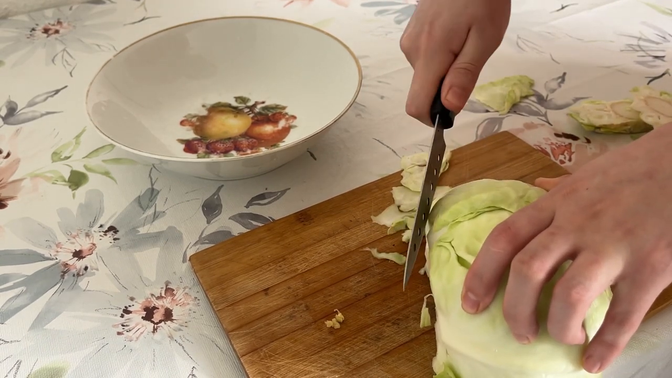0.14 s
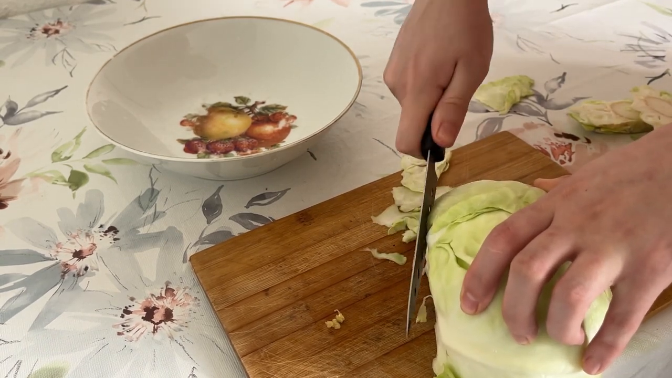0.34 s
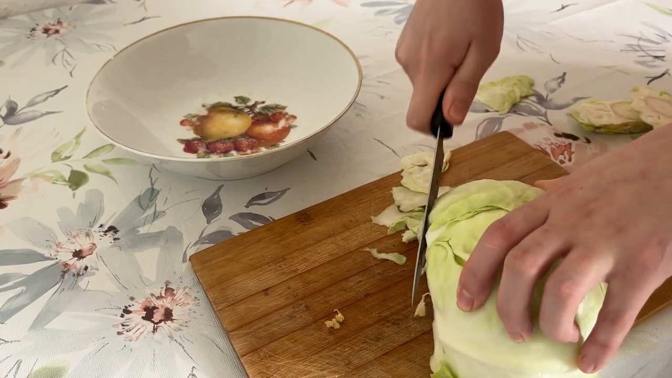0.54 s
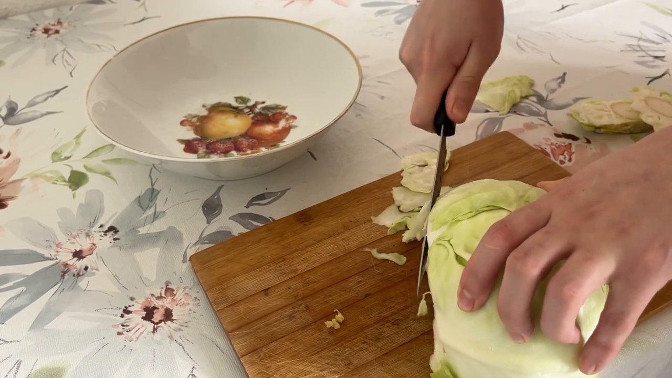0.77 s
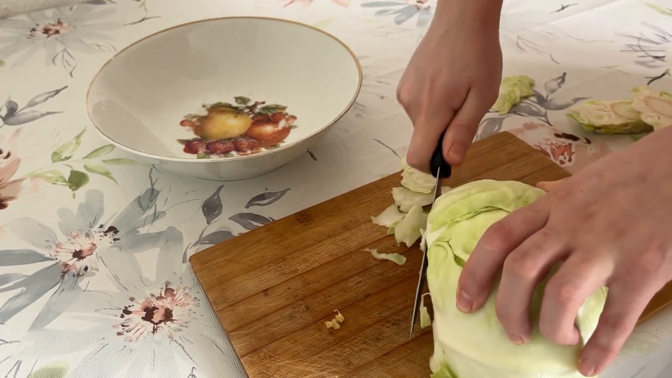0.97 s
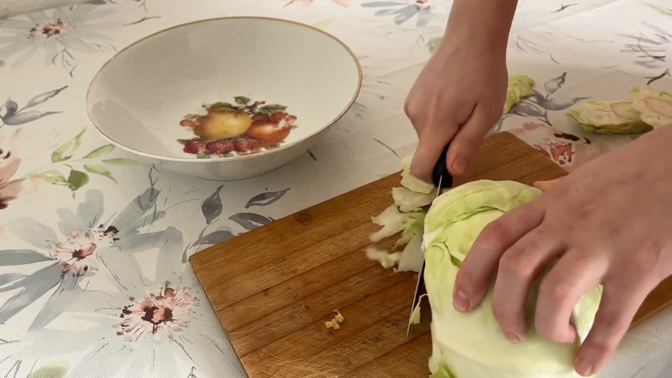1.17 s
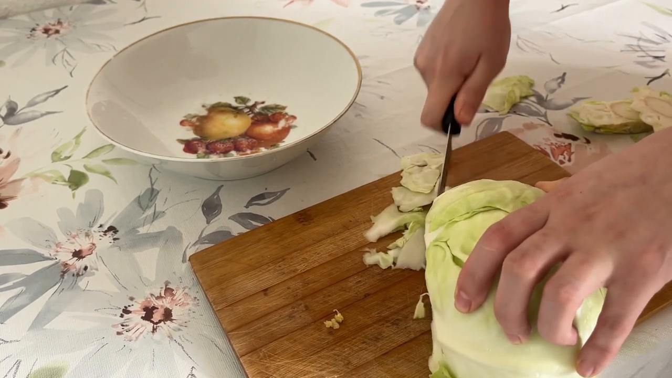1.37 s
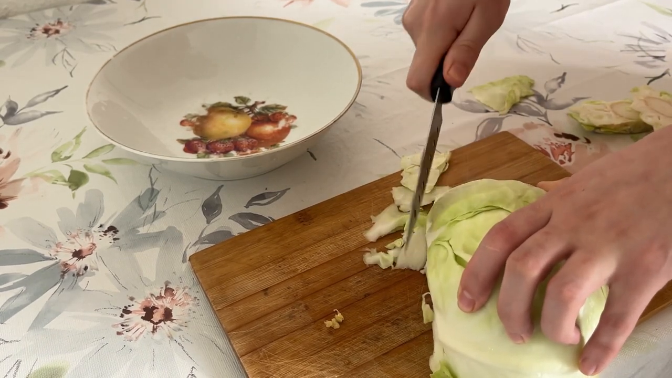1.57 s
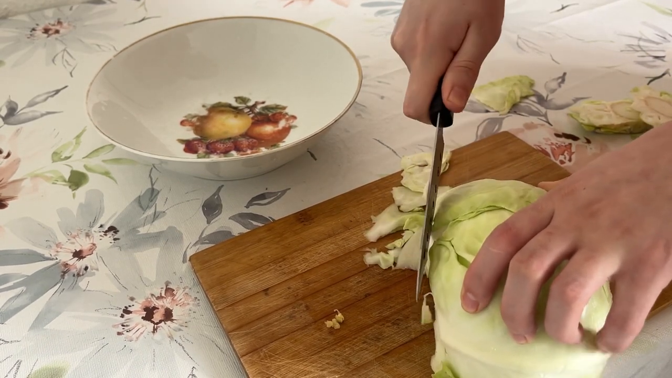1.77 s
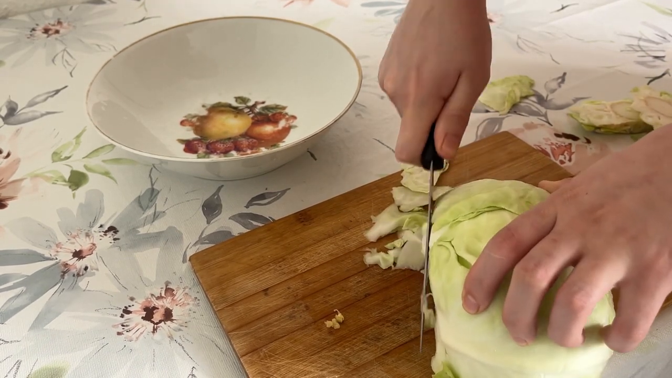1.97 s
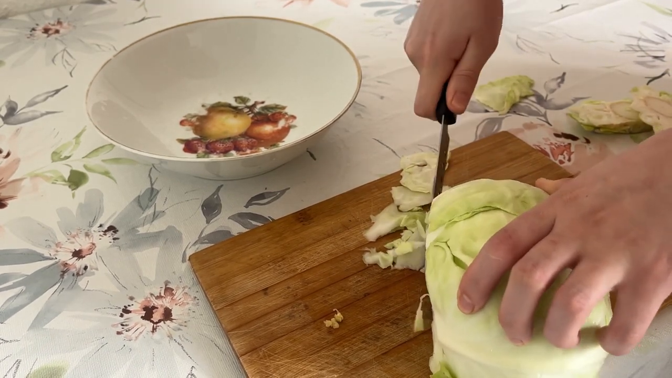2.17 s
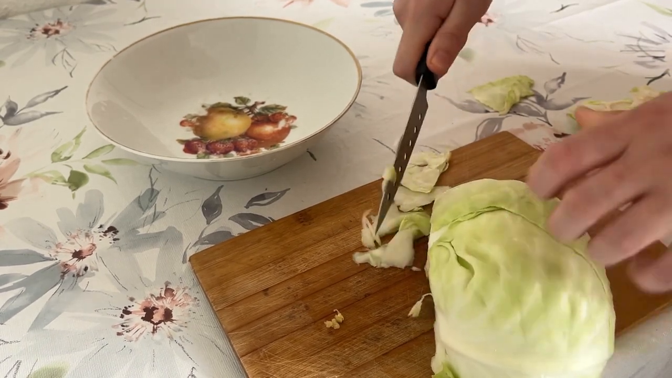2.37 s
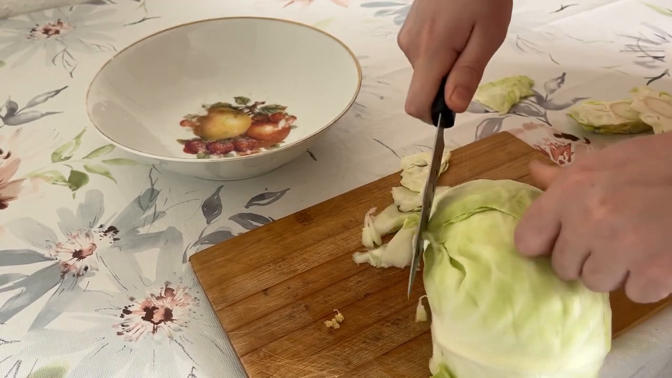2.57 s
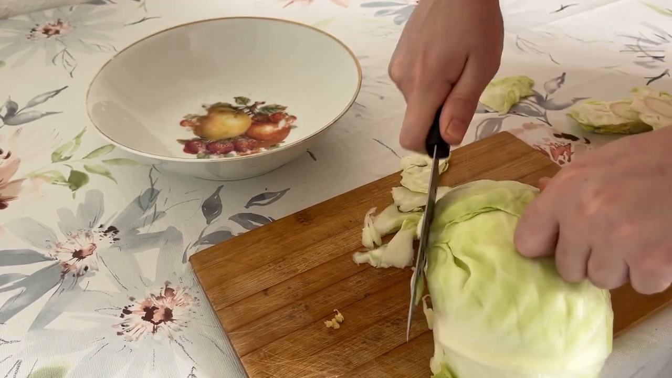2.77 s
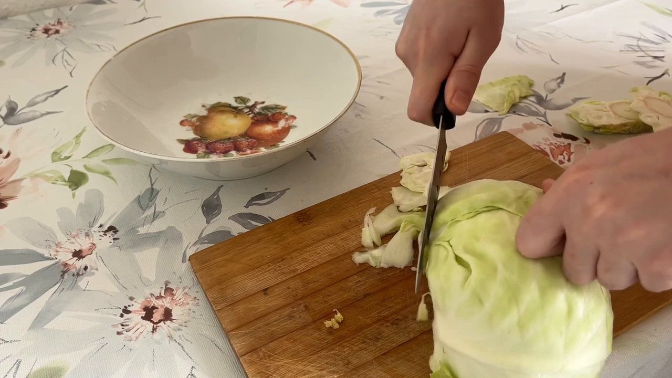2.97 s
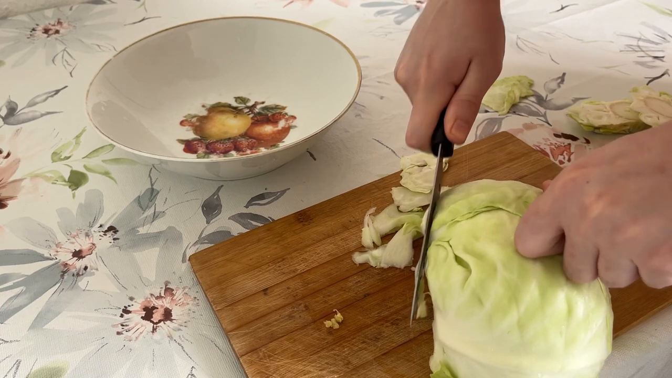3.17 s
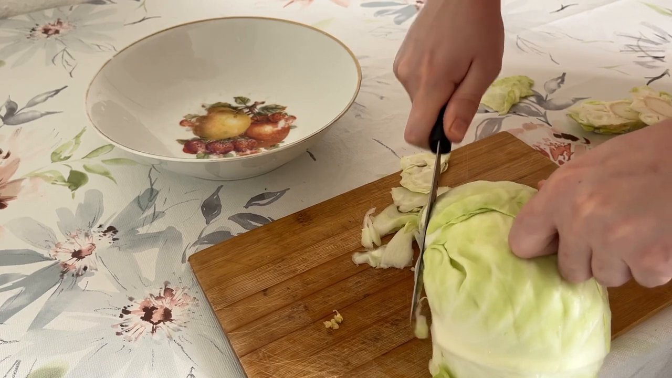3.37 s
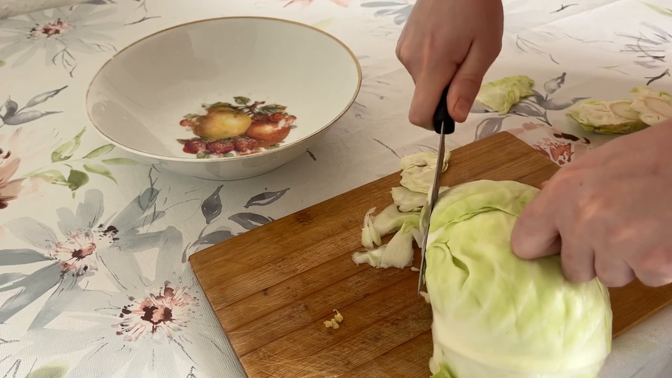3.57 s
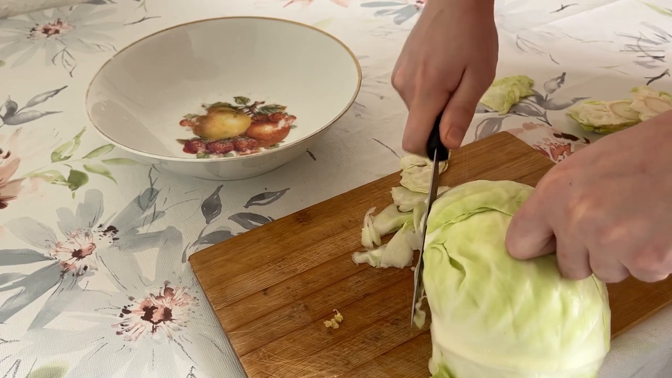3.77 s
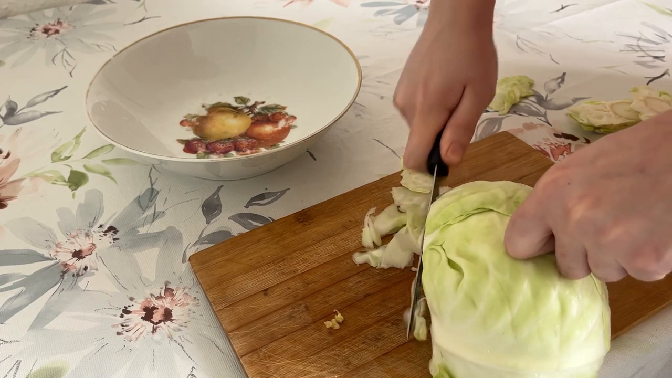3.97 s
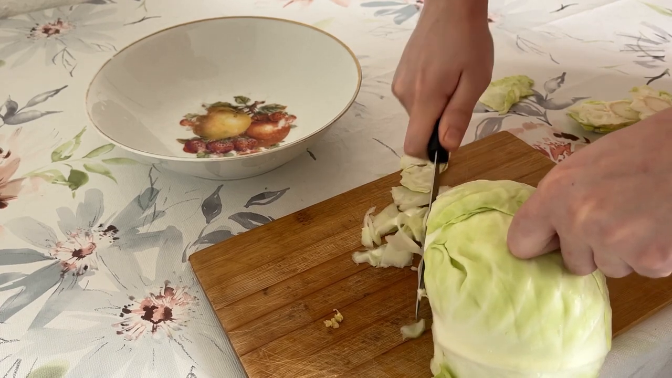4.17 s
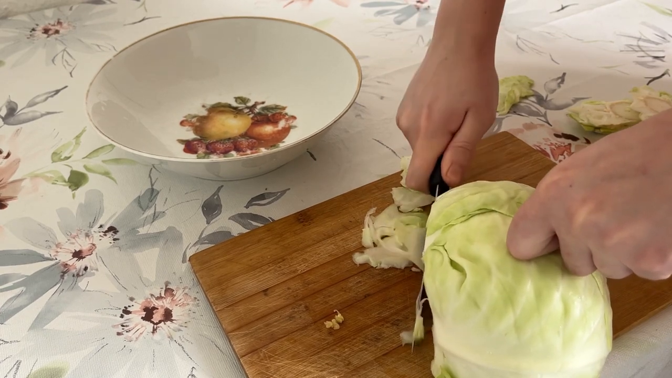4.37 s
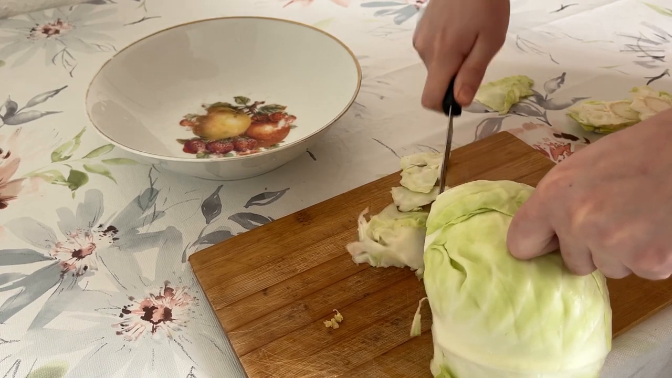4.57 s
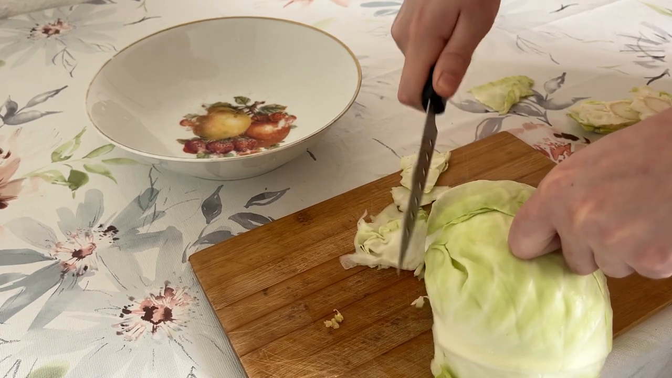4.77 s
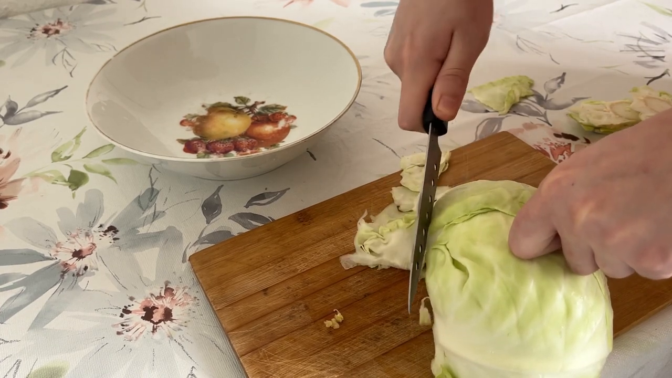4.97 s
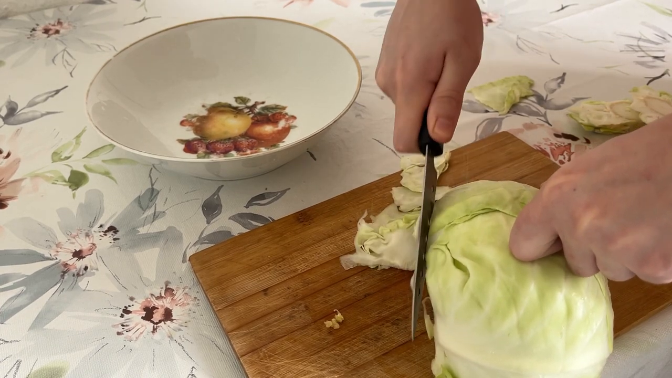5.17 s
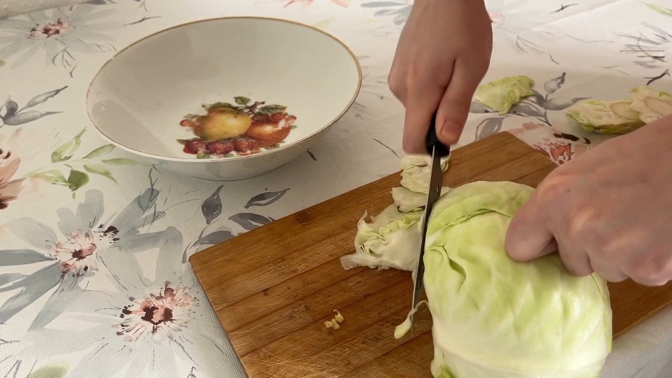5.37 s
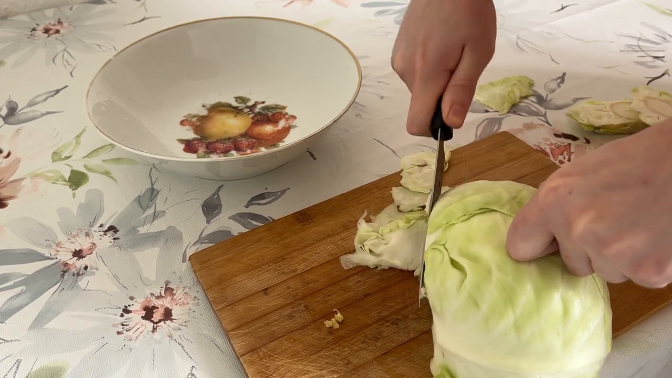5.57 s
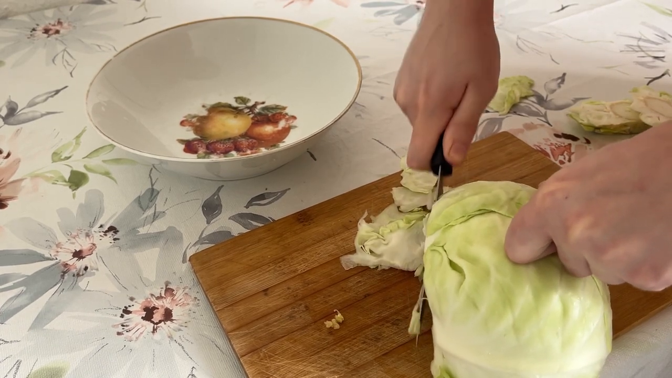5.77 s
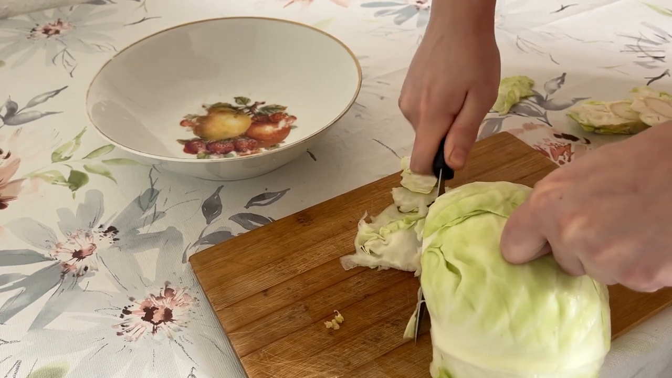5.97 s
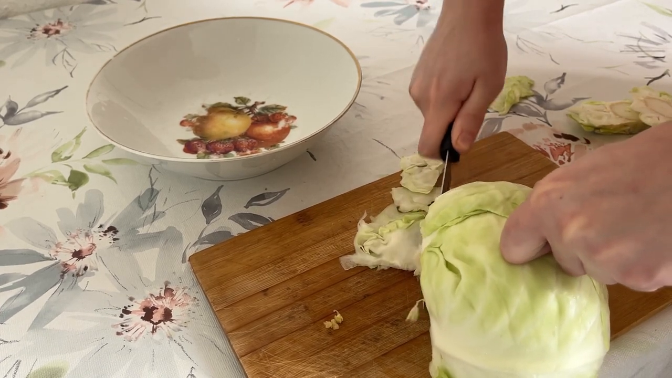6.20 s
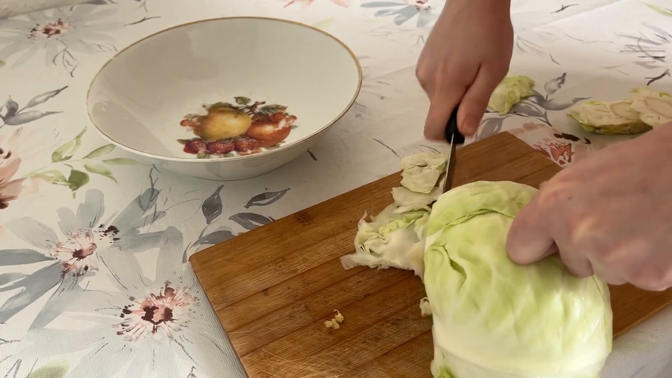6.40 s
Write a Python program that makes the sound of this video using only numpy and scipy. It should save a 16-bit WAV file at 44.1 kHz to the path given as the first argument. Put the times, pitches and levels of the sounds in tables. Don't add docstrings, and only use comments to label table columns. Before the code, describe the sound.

A knife saws crisply through a cabbage head, with a few sharp knocks and short scrapes on a wooden board over faint room hum.

```python
import sys
import numpy as np
from scipy import signal
from scipy.fft import rfft, irfft
from scipy.io import wavfile
from scipy.ndimage import uniform_filter1d

SR = 44100
rng = np.random.default_rng(int(sys.argv[2]) if len(sys.argv) > 2 else 0)


def persist_wave(psi):
    counts = np.round(np.clip(psi, -1, 1) * 32767).astype(np.int16)
    wavfile.write(sys.argv[1], SR, np.atleast_2d(counts).T)


def magnitude_from_level(level_db):
    exponent = np.asarray(level_db, float) / 20
    return 10 ** exponent


N = 283959

# time in seconds, level in dB.
RUMBLE_DB = [(0.0, -45.5), (0.5, -47), (0.81, -63), (0.84, -48), (0.91, -61.5), (2.29, -46), (2.6, -53),
             (2.69, -46), (2.78, -61.5), (3.23, -47), (3.28, -57.5), (3.95, -43.5), (5.09, -56.5),
             (5.22, -52.5), (6.38, -53.5), (6.44, -61)]
# time in seconds, pitch in Hz.
RUMBLE_HZ = [(0, 55.3), (2.6, 51.4), (2.9, 67.7), (3.2, 59), (3.6, 66.3), (4.5, 59), (4.8, 55.6),
             (6.44, 58.4)]
# pitch in Hz, rms level in dB.
HUM = [(96.9, -56), (200.7, -63), (121.4, -62.5), (298, -68.5)]
# frequency in Hz, level in dB per Hz.
AIR_SPECTRUM = [(15, -62.5), (25, 3.5), (75, -7.5), (148, -19.5), (274, -14), (349, -20), (469, -17.5),
                (684, -23), (945, -19.5), (1700, -28), (2300, -39.5), (3090, -43), (6730, -50), (7910, -92),
                (9300, -56.5), (15500, -70.5)]
# time in seconds, gain in dB.
AIR_SWELL_DB = [(0, 7.5), (1.0, 4), (1.7, 4), (2.4, 3), (3.5, 0.5), (4.9, -1.5), (6.44, 2)]

# strongest at in seconds,
# length in seconds, crunch in dB, fizz in dB re crunch, board in dB re crunch.
LEANS = [
    (0.304, 0.19, -56.5, 0, 2.6),
    (0.235, 0.13, -68, -16, 7.7),
    (1.126, 0.048, -43, -0.5, 1.3),
    (1.91, 0.21, -50.5, -0.5, 5),
    (2.787, 0.12, -56, -7, 1.5),
    (3.998, 0.27, -50, -7.5, 5.8),
    (4.307, 0.13, -44.5, -3, 9.1),
    (5.386, 0.25, -48.5, -11.5, 3),
    (5.963, 0.12, -47, -5, 2.3),
    (6.192, 0.021, -41.5, -10, 8.3),
]
# strongest at in seconds, length in seconds, crunch in dB,
# fizz in dB re crunch, board in dB re crunch.
PUSHES = [(0.56, 0.19, -50, -5.5, 4), (0.847, 0.18, -50, -6, 1.5), (2.70, 0.21, -61.5, -8, 3),
          (3.048, 0.17, -54.5, -5.5, 5.5), (3.344, 0.18, -57.5, -5, 6.5), (3.643, 0.24, -61.5, -3, 8.5),
          (4.881, 0.14, -67.5, -1, 5), (4.96, 0.13, -78, -9, -6), (5.051, 0.22, -55.5, -8, -5),
          (5.193, 0.19, -56.5, -10.5, -8), (5.644, 0.15, -42.5, -11, -0.5), (5.676, 0.11, -61.5, 0, 16.5)]
# strongest at in seconds, length in seconds,
# crunch in dB, fizz in dB re crunch, board in dB re crunch.
PULLS = [(0.448, 0.13, -64.5, -1.5, 8), (0.712, 0.15, -69.5, -7.5, 12), (1.002, 0.36, -65, -5.5, 9),
         (1.689, 0.22, -85, 1.5, 9.5), (1.809, 0.055, -74.5, 8, 10), (2.032, 0.14, -60.5, -7.5, 2),
         (2.56, 0.27, -71, -13, 12), (2.903, 0.17, -59.5, -13.5, -3), (3.21, 0.15, -64, -4, 6),
         (3.501, 0.16, -65.5, -7.5, 2.5), (3.798, 0.153, -66.5, -10, -6), (4.16, 0.15, -59, -10.5, 0),
         (5.512, 0.15, -61.5, -9.5, 3), (5.8, 0.17, -58.5, -13, -5), (6.124, 0.14, -79.5, 14, -2)]
# frequency in Hz, level in dB.
LEAF = [(120, -18.5), (300, 9.5), (800, 1.5), (2000, 10), (4000, 8.5), (7000, 6), (9000, -14)]
# frequency in Hz, level in dB.
FIZZ = [(5000, -13.5), (8300, -3.5), (11000, -5), (14000, -7), (15700, -10)]
# time in seconds, pitch in Hz, level in dB re crunch.
LEAF_RING = [(0.6, 4420, -19.5), (0.87, 3300, -3.5), (1.8, 4500, -1.5), (4.8, 4540, -17.5),
             (5.05, 4470, -1), (5.24, 4200, -3), (5.32, 6500, -5), (5.7, 6200, -10.5), (5.9, 3600, -16)]
# start in seconds, peak in dB, pitch in Hz, width as a share of pitch.
SNAPS = [(0.2593, -60, 4770, 1.5), (0.5277, -53, 3000, 1.5), (0.831, -58, 3600, 1.),
         (1.1177, -54, 3640, 1.), (1.6402, -62, 3400, 2.5), (1.7893, -64.5, 5200, 1.5),
         (2.6788, -64, 4000, 2.2), (3.023, -47, 4300, 1.4), (3.3129, -65, 3980, 2.7),
         (3.9383, -49, 3100, 1.5), (4.2527, -53, 3300, 1.4), (5.0115, -61, 4300, .8),
         (5.1866, -50, 3950, 0.34), (5.3058, -55, 5000, 2.5), (5.413, -63, 5000, 2.5),
         (5.9244, -49, 3300, 0.74), (6.138, -52, 3000, .7), (6.15, -44, 2600, 0.33), (0.8041, -52, 6000, 4),
         (0.9494, -47.5, 3960, 1.), (0.9735, -54, 3480, 0.73), (1.9731, -30, 4000, 4.8),
         (2.2196, -58, 2860, 0.28), (2.382, -55.5, 5970, 1.1), (2.526, -59.5, 4000, 3),
         (3.1375, -51, 3500, 1), (3.1860, -52.5, 2000, 0.4), (3.4982, -54, 2500, 2.2),
         (4.1374, -49, 2600, 0.48), (4.146, -47, 2850, 0.49), (4.882, -51, 3500, 2.2),
         (5.1666, -44, 4300, 0.47), (5.491, -58, 3500, 0.85), (5.51, -45.5, 5200, 0.57),
         (5.549, -58, 3020, 0.68), (5.6221, -49.5, 6400, 0.33), (5.745, -43.5, 2440, 1.9),
         (6.074, -40, 2700, 0.38), (6.133, -43, 2500, 0.3), (6.143, -47, 2800, .9), (6.324, -47, 2600, 0.8)]
# strongest at in seconds, length in seconds, level in dB, pitch in Hz.
CREAKS = [(0.29, 0.11, -56, 1350), (1.824, 0.12, -56.5, 1240), (2.62, 0.56, -66, 1550),
          (4.43, 0.08, -61.5, 3250), (4.466, 0.064, -49, 3200), (1.334, 0.089, -48, 3160),
          (4.667, 0.21, -61.5, 1560), (5.676, 0.11, -46, 590), (6.047, 0.2, -43.5, 1460)]

# time in seconds, pitch in Hz, level in dB.
SQUEAL = [(1.105, 1550, -55), (1.118, 1600, -41), (1.132, 1600, -36), (1.137, 1600, -60)]
# start in seconds, peak in dB, body, upper and top rings in dB re main ring.
KNOCKS = [(1.133, -1, -19, -5, 0.5), (1.303, -37, -24, -19, -2), (1.405, -27, -18, -6, -26),
          (2.072, -19.5, -14, -18.5, -13), (2.071, -32.5, -6, -34.5, 3), (3.751, -39.5, -30, -9, -31),
          (4.3176, -8, -18, -6, -24), (5.97, -6.5, -19.5, -4, -14.5), (6.183, -25.5, -26, -9, -4),
          (6.194, -26.5, -44, -27, -9), (6.2, -15, -14, -9.5, -6.5)]
# pitch in Hz, level in dB, T60 in seconds.
BOARD = [(184, -0.5, 0.1), (268.5, -5.5, 0.18), (503, 4.5, 0.051), (740, 18, 0.0038), (870, -1, 0.013),
         (950, 1, 0.026), (1155, 4, 0.014), (1336, 6, 0.02), (1594, 9, 0.011), (1748, -3, 0.024),
         (2600, -7.5, 0.007), (3030, 1.5, 0.013), (4500, -22, 0.0078)]
ZONES_HZ = [450, 930, 1600, 3100]
# strongest at in seconds, length in seconds, main ring in dB,
# upper rings in dB re main, grit in dB re main.
SETTLES = [
    (1.146, 0.19, -27, -2, -27.5),
    (1.402, 0.14, -60, -8, -30),
    (2.077, 0.12, -33.5, -10.5, -24.5),
    (4.33, 0.057, -57, -16, 4.5),
    (4.57, 0.33, -60, -6.5, -5.5),
    (5.981, 0.34, -38.5, -21, -18),
    (6.05, 0.33, -58.5, 6, -12.5),
    (6.201, 0.1, -36, 1, -11.5),
]
# strongest at in seconds, main ring in dB,
# singing edge in dB re main, grit in dB re main.
DRAGS = [
    (1.332, -42.5, 1.5, -7),
    (4.473, -33.5, -10.5, -15),
    (6.42, -40.5, -10, -11.5),
]
# pitch in Hz, width in Hz, level in dB.
SCRAPE = [(190, 160, -1), (454, 80, -2), (668, 140, -4), (906, 130, -2.5), (1265, 320, -2.5),
          (1540, 210, -7), (1844, 330, 0.5), (2657, 260, -2), (3163, 500, 4)]
# start in seconds, peak in dB, pitch in Hz, T60 in seconds.
SLIPS = [(1.15, -20, 1470, 0.046), (1.163, -14, 1190, 0.026), (1.186, -17.5, 920, 0.046),
         (1.205, -18.5, 1730, 0.022), (1.19, -28, 3100, 0.033), (1.303, -29, 1905, .05),
         (1.33, -20.5, 1836, 0.043), (1.338, -19, 1915, 0.043), (1.355, -27, 1920, 0.035),
         (2.073, -18.5, 916, 0.056), (2.09, -27, 880, .04), (2.096, -28.5, 931, 0.11),
         (2.092, -36, 1850, 0.087), (2.092, -47, 3070, 0.055), (2.104, -17, 895, 0.018),
         (2.076, -40, 3010, 0.063), (2.104, -42, 3180, .03), (4.305, -24, 1920, .02),
         (4.311, -32, 1980, 0.017), (4.326, -21, 1270, 0.033), (4.336, -21, 924, 0.062),
         (4.364, -27.5, 1564, 0.053), (4.372, -28, 980, .03), (4.39, -36, 1190, .03),
         (4.432, -22, 1750, 0.034), (4.465, -21, 1880, 0.051), (4.484, -29, 1970, .08),
         (4.506, -21, 950, 0.044), (5.99, -23, 1515, 0.036), (6.015, -29, 1630, 0.056),
         (6.074, -29, 1460, 0.053), (6.198, -14.5, 1950, 0.022), (6.359, -32, 1750, 0.034)]
# start in seconds, peak in dB, pitch in Hz, T60 in seconds.
BUMPS = [
    (1.62, -54, 62.6, .2),
    (3.992, -39, 157, 0.16),
    (4.82, -42.5, 399, 0.11),
    (5.697, -29, 114, 0.14),
]

# frequency in Hz, T60 in seconds.
KITCHEN_T60 = [(150, 0.53), (400, 0.48), (1000, 0.33), (2800, 0.18), (8000, 0.14)]
# frequency in Hz, correlation from -1 to 1.
ECHO_SAME = [(50, 0.995), (100, 0.43), (200, 0.66), (400, 0.42), (1000, -0.35), (1700, -0.0081),
             (2200, 0.41), (6500, -0.53), (7600, 0.67)]
# frequency in Hz, phase in half turns.
PORT_LEAD = [(0, 0), (1000, .05), (3000, -.3), (5100, 0), (8300, 1), (12050, 2), (15400, 3)]
# frequency in Hz, left minus right in dB.
PORT_DB = [(100, 0), (400, -2), (800, 1.5), (3000, 3), (6000, 1.5), (7600, 0)]

# rising share of length, falloff exponent, dB down at the ends
PUSH, LEAN, PULL = (0.32, 2.59, 43.4), (0.61, 1.57, 34.5), (0.48, 2.4, 11)
DRAG, SETTLE = (0.45, 2.2, 15), (0.08, 1.1, 16)
DRAG_S = 0.2
CUT_BODY_DB, CUT_UPPER_DB = -3.5, -2.5
DRAG_BODY_DB, DRAG_UPPER_DB = -9.5, -1.5
GRIT_FIZZ_DB = -11.5
GRIT_RING_HZ, GRIT_RING_DB = 3150, 0.5
EDGE_HZ, EDGE_WIDTH_HZ = 1890, 170
CREAK_WIDTH = 0.3
SNAP_T60_S = 0.016
SLIP_RISE_S, BUMP_RISE_S = 0.003, 0.0086
KNOCK_ROOM_DB, CRACK_S = -3.5, 0.003
AIR_DB = -52


def evened(x):
    return x / np.sqrt(np.mean(x ** 2) + 1e-20)


def read(points, hz):
    f, value = np.transpose(points)
    return np.interp(np.log(hz + 1), np.log(f + 1), value)


def curves(table):
    s, *columns = np.transpose(table)
    return [np.interp(np.arange(N) / SR, s, c) for c in columns]


def colour(x, points):
    hz = np.fft.rfftfreq(N, 1 / SR)
    inside = (hz > points[0][0] / 2) & (hz < points[-1][0] * 1.02)
    return evened(irfft(rfft(x) * magnitude_from_level(read(points, hz)) * inside, N))


def resonate(x, hz, width_hz):
    r = np.exp(-np.pi * width_hz / SR)
    if np.ndim(hz) == 0:
        return 2 * signal.lfilter([1 - r], [1, -r * np.exp(2j * np.pi * hz / SR)], x).real
    turn = np.exp(2j * np.pi * np.cumsum(hz) / SR)
    return 2 * (turn * signal.lfilter([1 - r], [1, -r], x / turn)).real


def resonate_twice(x, hz, width_hz, second_width_hz):
    return resonate(resonate(x, hz, width_hz), hz, second_width_hz)


def crackle(per_s, spread_db, clump_db, largest):
    size = magnitude_from_level(spread_db * np.minimum(rng.exponential(1, N), largest))
    drift = uniform_filter1d(uniform_filter1d(rng.standard_normal(N), 400), 400)
    clicks = rng.standard_normal(N) * (rng.random(N) < per_s / SR)
    return evened(magnitude_from_level(clump_db * evened(drift)) * size * clicks)


def add(mix, s, sound):
    part = mix[round(s * SR):][:len(sound)]
    part += sound[:len(part)]


def zone(hz, levels_db):
    at = np.interp(np.log(hz), np.log(ZONES_HZ), np.arange(len(ZONES_HZ)))
    return sum(max(1 - abs(at - k), 0) * db for k, db in enumerate(levels_db))


def stroke(s, length, shape):
    rising, exponent, ends_db = shape
    t = np.arange(0, N / SR + 0.002, 0.001) - s
    far = np.where(t < 0, -t / rising, t / (1 - rising)) / length
    return magnitude_from_level(-ends_db * np.minimum(far, 3) ** exponent) * (far < 3)


def per_sample(per_ms):
    return np.interp(np.arange(N) * 1000 / SR, np.arange(len(per_ms)), per_ms)


def room_tone():
    hz = curves(RUMBLE_HZ)[0]
    rumble = evened(resonate_twice(rng.standard_normal(N), hz, 6.7, 14.0))
    envelope = abs(signal.hilbert(rumble))
    rumble = evened(rumble / (envelope + 0.15) ** 0.7)
    t = np.arange(N) / SR
    waver = evened(uniform_filter1d(rng.standard_normal((len(HUM), N)), 6000))
    hum = np.zeros(N)
    for (f, db), w in zip(HUM, waver):
        hum += magnitude_from_level(db + 2.1 * w) * np.sqrt(2) * np.sin(2 * np.pi * (f * t + rng.random()))
    return magnitude_from_level(curves(RUMBLE_DB)[0] + 3.0) * rumble + hum


def air():
    frames, hz = N // 512 + 5, np.fft.rfftfreq(2048, 1 / SR)
    a, b, c, d, patches = rng.standard_normal((frames, 1025, 5)).T
    patches = evened(uniform_filter1d(uniform_filter1d(patches, 14, 0), 8, 1))
    z = np.array([a + 1j * b, c + 1j * d]) * magnitude_from_level(read(AIR_SPECTRUM, hz)[:, None] + 0.77 * patches)
    return magnitude_from_level(AIR_DB) * evened(signal.istft(z, nperseg=2048, noverlap=1536)[1][:, :N])


def blade():
    leaf = wood = edge = 0
    for shape, rows in ((PUSH, PUSHES), (LEAN, LEANS), (PULL, PULLS)):
        for s, length, db, fizz, board in rows:
            levels_db = db + np.array([0, fizz, board, board + CUT_BODY_DB, board + CUT_UPPER_DB])
            leaf = leaf + np.outer(magnitude_from_level(levels_db), stroke(s, length, shape))
    drags = [(DRAG, s, DRAG_S, db, DRAG_UPPER_DB, grit) for s, db, _, grit in DRAGS]
    for shape, s, length, db, upper, grit in drags + [(SETTLE, *row) for row in SETTLES]:
        levels_db = db + np.array([grit, grit + GRIT_FIZZ_DB, 0, DRAG_BODY_DB, upper])
        wood = wood + np.outer(magnitude_from_level(levels_db), stroke(s, length, shape))
    for s, db, sing, _ in DRAGS:
        edge = edge + magnitude_from_level(db + sing) * stroke(s, DRAG_S, DRAG) ** 2.3
    on_wood = wood[0] / (wood[0] + leaf[0] + 1e-9)
    return [per_sample(g) for g in (*(leaf + wood + 1e-9), edge, on_wood)]


def sawing(crunch_gain, fizz_gain, on_wood):
    leaf_hz, leaf_db = curves(LEAF_RING)
    ring_hz = leaf_hz + (GRIT_RING_HZ - leaf_hz) * on_wood
    ring_db = leaf_db + (GRIT_RING_DB - leaf_db) * on_wood
    cells = crackle(per_s=8000, spread_db=-1.0, clump_db=2.04, largest=6.8)
    ribs = crackle(per_s=350, spread_db=2.5, clump_db=1.0, largest=3.3)
    cells = evened(cells + magnitude_from_level(-9.5) * ribs)
    ring = evened(resonate_twice(cells, ring_hz, 1300.0, 1300.0))
    crunch = evened(colour(cells, LEAF) + magnitude_from_level(ring_db) * ring)
    return magnitude_from_level(-2.0) * crunch_gain * crunch + magnitude_from_level(5.5) * fizz_gain * colour(cells, FIZZ)


def rubbing(main, body, upper, edge):
    slips = crackle(per_s=5000, spread_db=2.2, clump_db=1.3, largest=2.5)
    slips = np.tanh(slips / 6)
    body_db, upper_db = 20 * np.log10(body / main), 20 * np.log10(upper / main)
    levels_db = [body_db, 0, upper_db, upper_db - 11.5]
    rings = np.zeros(N)
    for k, (hz, width_hz, db) in enumerate(SCRAPE):
        ring = evened(resonate_twice(slips, hz, width_hz, 2 * width_hz))
        rings += (-1) ** k * magnitude_from_level(db + zone(hz, levels_db)) * ring
    edge_hz = EDGE_HZ + 70 * evened(uniform_filter1d(rng.standard_normal(N), 900))
    song = evened(resonate_twice(slips, edge_hz, EDGE_WIDTH_HZ, 2 * EDGE_WIDTH_HZ))
    return magnitude_from_level(-7.0) * main * rings + edge * song + creaks(slips)


def snap(hz, share):
    t = np.arange(2048) / SR
    noise = resonate_twice(rng.standard_normal(2048), hz, share * hz, 2 * share * hz)
    burst = noise * magnitude_from_level(-60 * t / SNAP_T60_S) * (1 - np.exp(-t / 0.00013))
    return burst / abs(burst).max()


def creaks(slips):
    out = np.zeros(N)
    for s, length, db, hz in CREAKS:
        leaf = evened(resonate_twice(slips, hz, CREAK_WIDTH * hz, 2 * CREAK_WIDTH * hz))
        out += magnitude_from_level(db) * per_sample(stroke(s, length, DRAG)) * leaf
    return out


def squeal():
    hz, db = curves(SQUEAL)
    return magnitude_from_level(db) * (db > -54.9) * evened(resonate(rng.standard_normal(N), hz, 90.0))


def knock(body_db, upper_db, top_db):
    t = np.arange(4000) / SR
    levels_db = [body_db, 0, upper_db, top_db]
    spot = rng.standard_normal((2 * len(BOARD), 3))
    ring = np.zeros(len(t))
    for (hz, db, t60), (a, b, c) in zip([*BOARD, *BOARD], spot):
        decay = magnitude_from_level(db + zone(hz, levels_db) + 2.7 * a - 60 * t / t60)
        swell = (1 - np.exp(-t * hz / 1.09)) ** 2
        ring += decay * swell * np.sin(2 * np.pi * hz * (1 + 0.034 * b) * t + c / 5)
    ring *= 1.25 + np.exp(-t / 0.009)
    return -ring / abs(ring).max()


def bump(hz, t60, rise_s):
    t = np.arange(12000) / SR
    return np.sin(2 * np.pi * hz * t) * magnitude_from_level(-60 * t / t60) * (1 - np.exp(-t / rise_s))


def kitchen(x):
    taps = np.zeros((6, SR))
    at = np.arange(200, SR - 20, 20) + rng.integers(0, 20, (6, (SR - 201) // 20))
    np.put_along_axis(taps, at, rng.choice([-1.0, 1.0], at.shape), 1)
    hz, t, z = signal.stft(taps, SR, nperseg=128)
    decay = magnitude_from_level(-60 * t / read(KITCHEN_T60, hz)[:, None])
    tail = signal.istft(z * decay, SR, nperseg=128)[1]
    turn = np.arange(N) / SR / 0.07 + np.arange(6)[:, None] // 2 * np.pi / 3
    sent = x * np.cos(turn) * np.sqrt(2 / 3)
    wet = signal.fftconvolve(sent, tail / np.linalg.norm(tail[0]), axes=1)
    return wet[:, :N].reshape(3, 2, N).sum(0)


def ports(direct, echoes):
    hz = np.fft.rfftfreq(N, 1 / SR)
    same = np.clip(read(ECHO_SAME, hz), -1, 1)
    near, first, second = rfft(direct), rfft(echoes[0]), rfft(echoes[1])
    right = near + same * first + np.sqrt(1 - same ** 2) * second
    lead = np.exp(1j * np.pi * np.interp(hz, *np.transpose(PORT_LEAD)))
    tilt = magnitude_from_level(read(PORT_DB, hz) / 2)
    return irfft(np.array([(near + first) * tilt, right * lead / tilt]), N)


def scene():
    crunch, fizz, main, body, upper, edge, on_wood = blade()
    direct = sawing(crunch, fizz, on_wood) + rubbing(main, body, upper, edge) + squeal()
    for s, db, hz, share in SNAPS:
        add(direct, s, magnitude_from_level(db + 8.0) * snap(hz, share))
    for s, db, hz, t60 in BUMPS:
        add(direct, s, magnitude_from_level(db) * bump(hz, t60, BUMP_RISE_S))
    sent = magnitude_from_level(-5.5) * direct
    for s, db, hz, t60 in SLIPS:
        slip = magnitude_from_level(db) * bump(hz, t60, SLIP_RISE_S)
        add(direct, s, slip)
        add(sent, s, magnitude_from_level(-15) * slip)
    for s, db, *zones_db in KNOCKS:
        blow = magnitude_from_level(db) * knock(*zones_db)
        crack = blow * np.exp(-np.arange(len(blow)) / SR / CRACK_S)
        add(direct, s, blow)
        add(sent, s, magnitude_from_level(KNOCK_ROOM_DB) * crack)
    thin = signal.lfilter(*signal.butter(2, 300, "high", fs=SR), sent)
    return ports(direct + room_tone(), kitchen(thin) + magnitude_from_level(curves(AIR_SWELL_DB)[0]) * air())


def low_pass(x):
    return signal.sosfilt(signal.butter(12, 15750, fs=SR, output="sos"), x)


def record(dry):
    low_cut = signal.sosfilt(signal.butter(4, 42, "high", fs=SR, output="sos"), dry)
    high_cut = signal.firwin(511, 15750, window=("kaiser", 9), fs=SR)
    return low_pass(signal.oaconvolve(low_cut, high_cut[None], "same"))


dry = scene()
out = record(dry)
persist_wave(out)
```